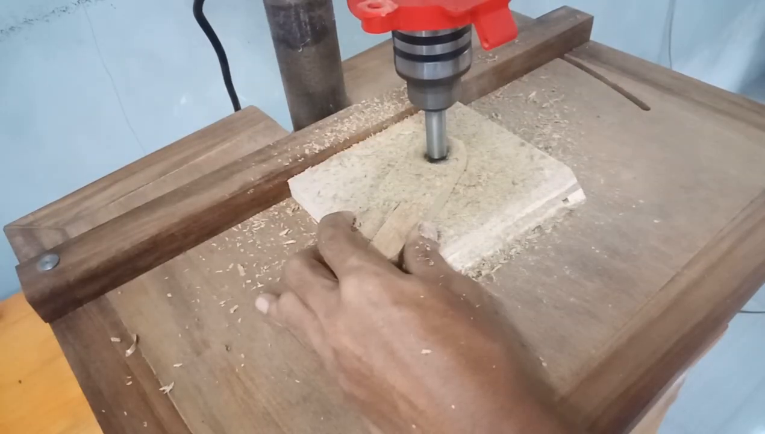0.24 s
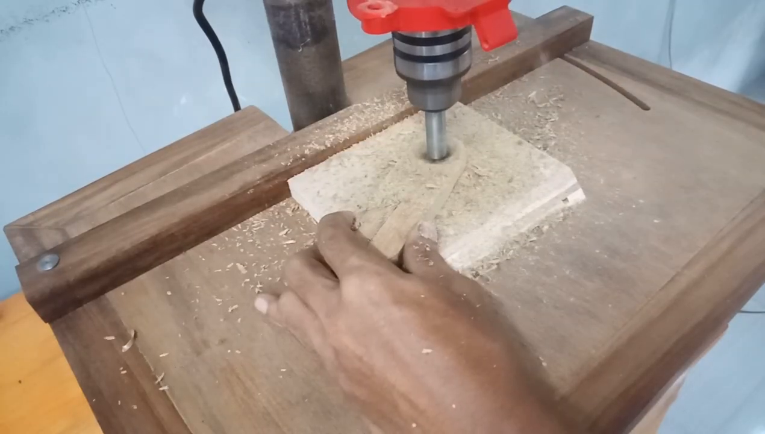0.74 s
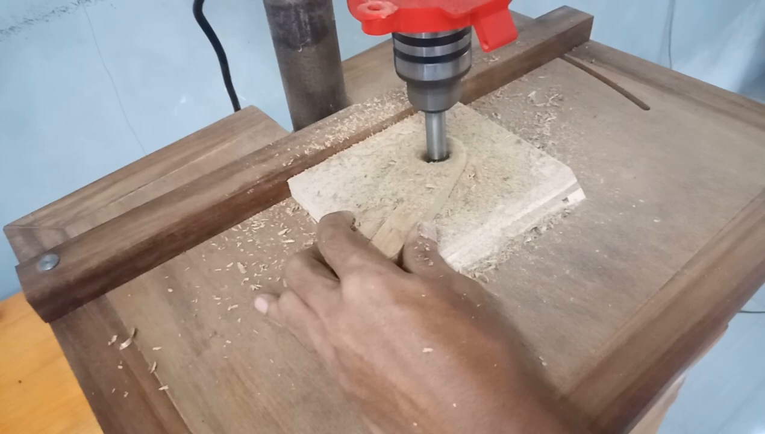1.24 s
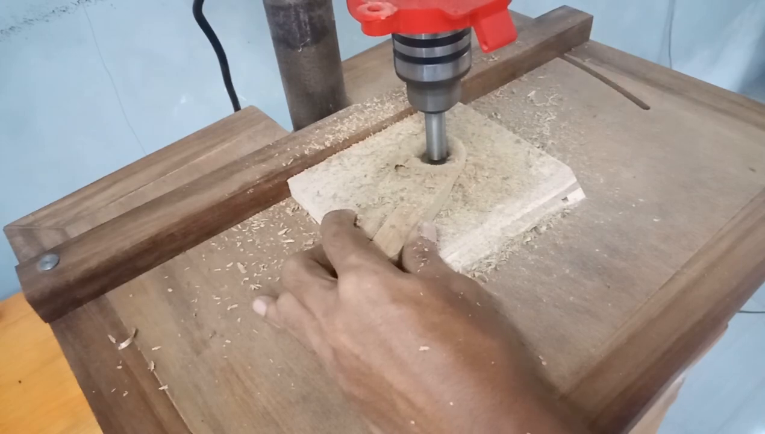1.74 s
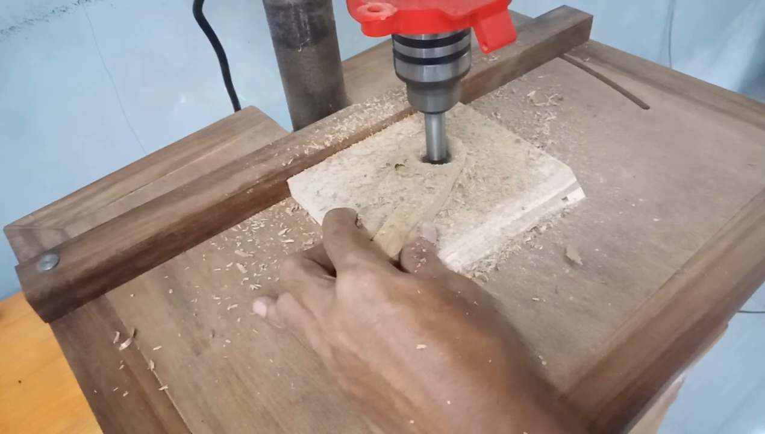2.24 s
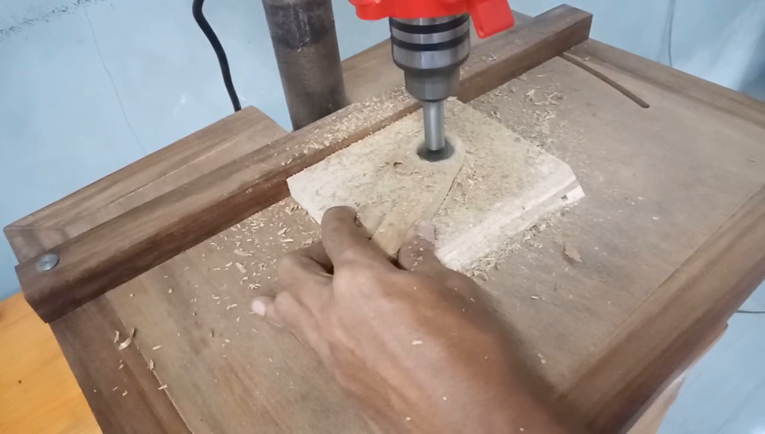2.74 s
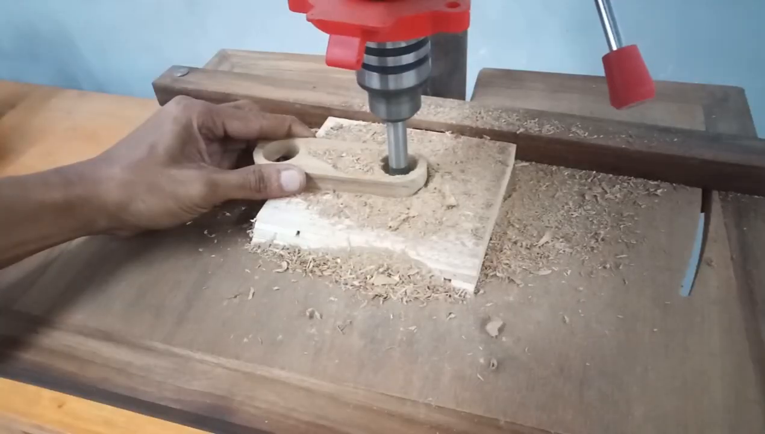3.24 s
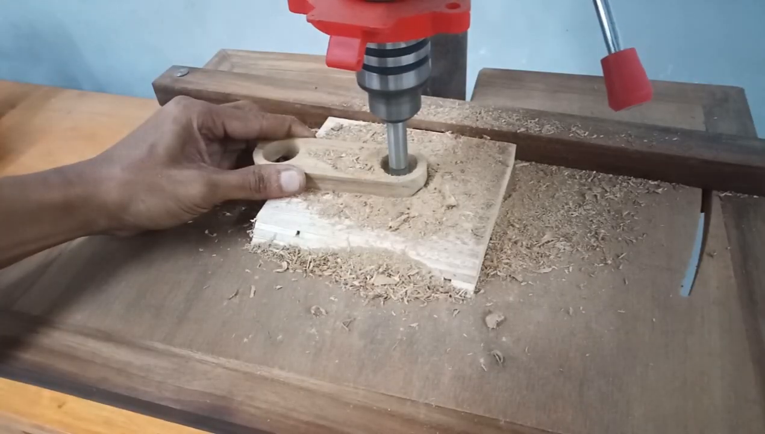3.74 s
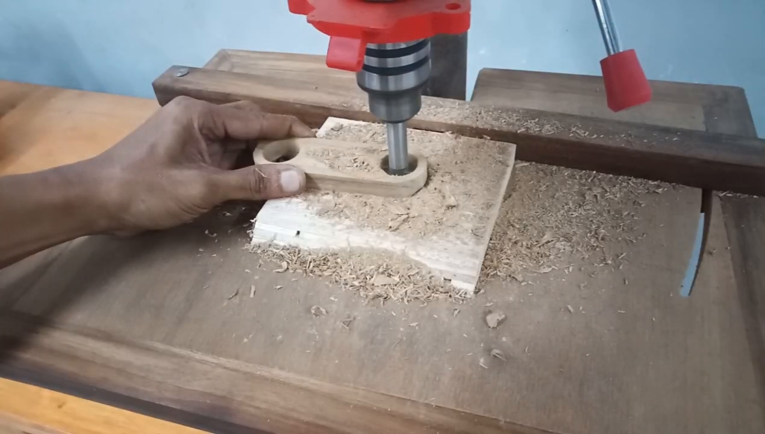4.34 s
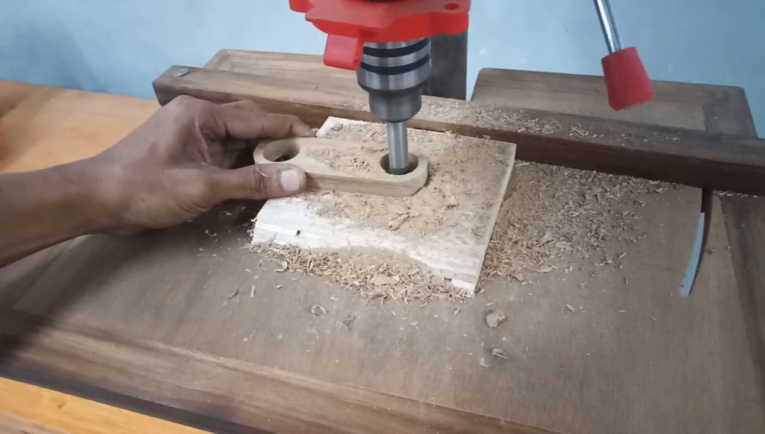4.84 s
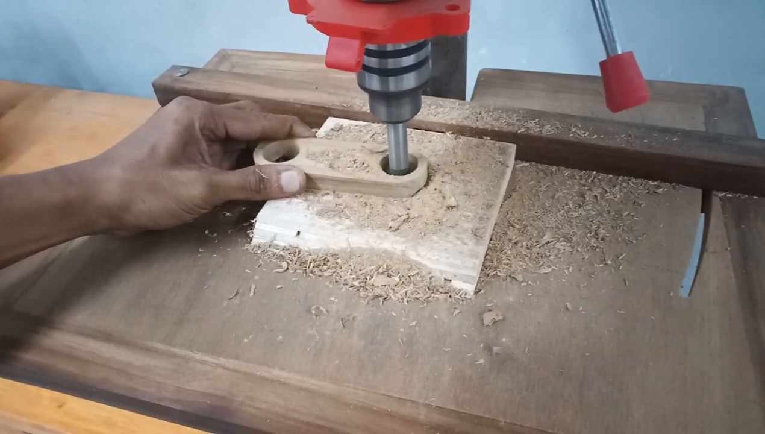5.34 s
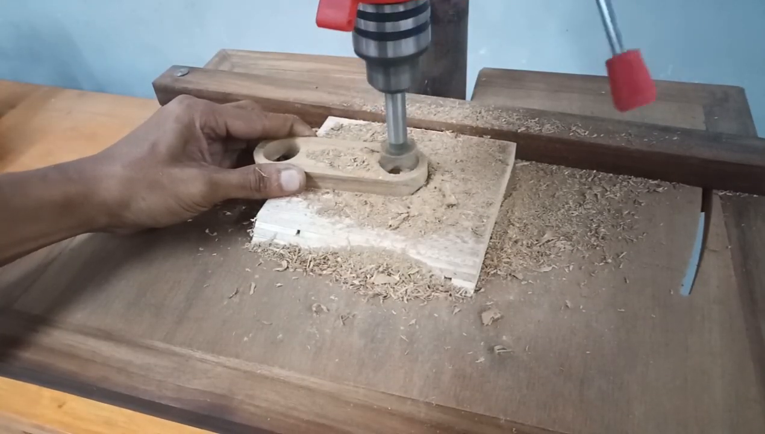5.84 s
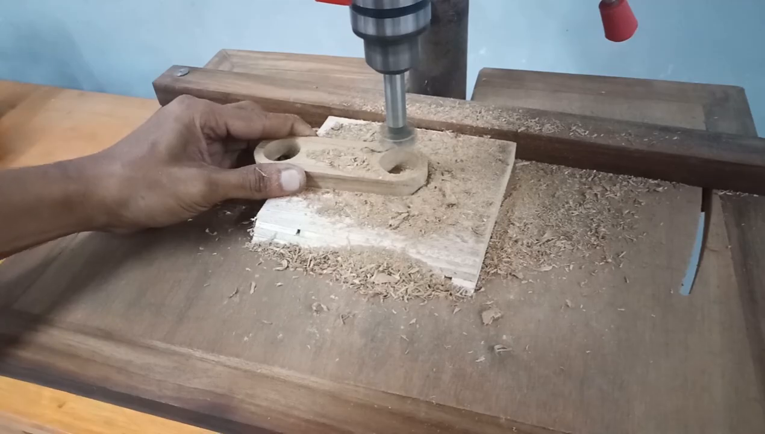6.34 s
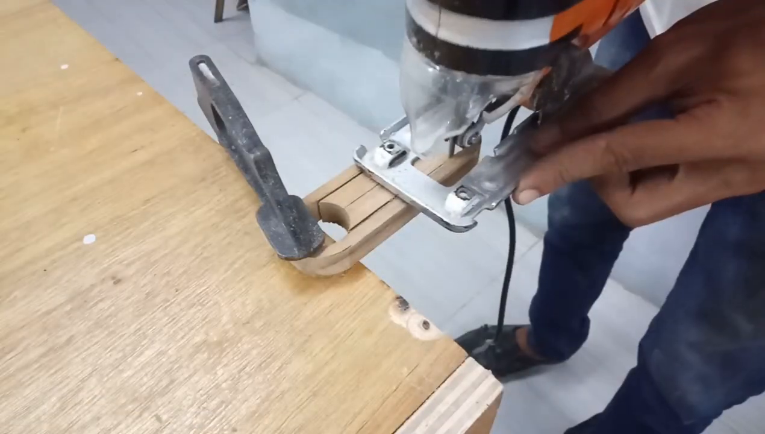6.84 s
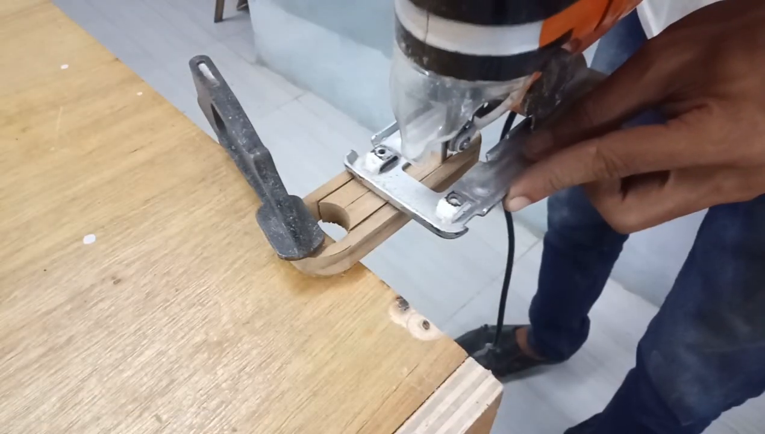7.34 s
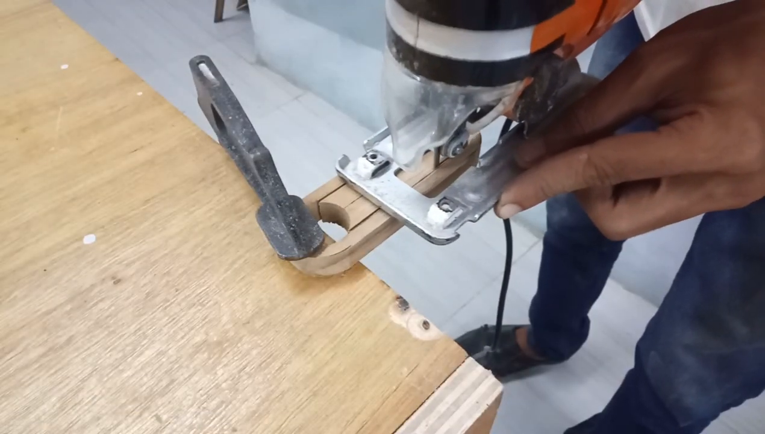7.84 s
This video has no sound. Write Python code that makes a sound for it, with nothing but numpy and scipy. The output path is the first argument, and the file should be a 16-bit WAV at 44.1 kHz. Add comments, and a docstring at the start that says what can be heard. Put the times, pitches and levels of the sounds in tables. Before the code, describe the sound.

Close in a workshop, rough rumbling drilling through wood in three plunges, a sharp knock and brief lull, then a buzzing, high-whining jigsaw cut.

```python
"""Drill press, then jigsaw

A drill press bores a small wooden board, then a wooden handle, close by in a workshop.
The bit's edges tear chips twice a turn and shake the wooden drill table; the drive belt throbs.
After a knock and a short lull, an electric jigsaw whines and chatters through a strip of wood.
Random fractures, rung through bodies of wood and steel, make the cutting; sines make hum and whine."""
import sys
import numpy as np
from scipy import signal
from scipy.fft import rfft, irfft
from scipy.io import wavfile

SR = 44100
rng = np.random.default_rng(int(sys.argv[2]) if len(sys.argv) > 2 else 0)


def master_out(mix):
    """Clip the mix to full scale and print it as 16-bit PCM to the path in sys.argv[1]."""
    frames = np.transpose(np.atleast_2d(mix))
    ceiling = np.clip(frames, -1, 1)
    pcm = np.round(ceiling * 32767).astype(np.int16)
    wavfile.write(sys.argv[1], SR, pcm)


N = 356769
TIME = np.arange(N) / SR


def gain_of(db):
    """Decibels to an amplitude factor."""
    return 10 ** (np.asarray(db) / 20)


def evened(x):
    """Scales to rms 1."""
    return x / np.sqrt(np.mean(x ** 2) + 1e-20)


def follow(rows):
    """Each column of a table as a curve in time."""
    s, *columns = np.transpose(rows)
    return [np.interp(TIME, s, column) for column in columns]


def wander(rate_hz):
    """Slow random drift of rms 1: noise that keeps only what lies below about rate_hz."""
    hz = np.fft.rfftfreq(N, 1 / SR)
    return evened(irfft(rfft(rng.standard_normal(N)) / (1 + (hz / rate_hz) ** 4), N))


def swell(start_s, rise_s, end_s=np.inf, fall_db_per_s=0):
    """A straight rise, a hold, and an even fall in dB after the end."""
    rise = np.clip((TIME - start_s) / rise_s, 0, 1)
    return rise * gain_of(-fall_db_per_s * np.maximum(TIME - end_s, 0))


def ring(x, colour, modes=(), size=8192):
    """Passes x through a causal (minimum-phase) body with a broad colour and resonances."""
    hz = np.fft.rfftfreq(size, 1 / SR)
    at_hz, level_db = np.transpose(colour)
    db = np.interp(np.log(hz + 1), np.log(at_hz), level_db)
    for centre_hz, width_hz, lift_db in modes:
        db = db + lift_db / (1 + (2 * (hz - centre_hz) / width_hz) ** 2)
    log_gain = np.log(gain_of(np.r_[db, db[-2:0:-1]]))
    response = np.fft.ifft(np.exp(np.conj(signal.hilbert(log_gain)))).real
    return signal.oaconvolve(x, response[:size // 2])[:N]


def resonate(x, hz, width_hz):
    """A steep resonance that follows the curve hz; rms 1."""
    turn = np.exp(2j * np.pi * np.cumsum(hz * np.ones(N)) / SR)
    r = np.exp(-np.pi * width_hz / SR)
    # shift the note down to zero, smooth it there, shift it back up
    smoothed = signal.lfilter([(1 - r) ** 2], [1, -2 * r, r * r], x / turn)
    return evened((turn * smoothed).real)


def fractures(per_s, spread_db):
    """Random clicks of breaking fibres, a few of them large; rms 1."""
    size = gain_of(spread_db * np.minimum(rng.exponential(1, N), 3))
    return evened(size * rng.choice([-1, 1], N) * (rng.random(N) < per_s / SR))


def surge(turns, depth_db):
    """A swell of force once a turn; rms 1."""
    return evened(gain_of(depth_db * np.cos(2 * np.pi * turns)))


def tones(turns, orders, waver_db):
    """Sines on multiples of a rotation, each wavering in level."""
    total = 0
    for multiple, level_db in orders:
        level = gain_of(level_db + waver_db * wander(23))
        total = total + level * np.sqrt(2) * np.sin(2 * np.pi * (multiple * turns + rng.random()))
    return total


def blows(rows, colour, modes=()):
    """One sharp push a row, heard through a body whose response is scaled to peak at 1."""
    pushes = np.zeros(N)
    for s, db in rows:
        pushes[round(s * SR)] = gain_of(db)
    return ring(pushes, colour, modes) / abs(ring(signal.unit_impulse(N), colour, modes)).max()


def bursts(rows, colour, modes=()):
    """Each burst is a run of fractures that starts quickly and dies away, heard through a body."""
    length_s, force = .04, 0
    for s, db in rows:
        progress = np.clip((TIME - s) / length_s, 0, 1)
        force = force + gain_of(db) * np.sin(np.pi * np.sqrt(progress))
    return force * evened(ring(fractures(5000, spread_db=1.5), colour, modes))


def room(x, wet_db, t60):
    """Adds the workshop's diffuse tail: each band's power dies away with scattered phase."""
    hop = 128
    hz, _, z = signal.stft(x, SR, nperseg=512, noverlap=512 - hop)
    keep = gain_of(-120 * hop / SR / t60)  # power kept from frame to frame
    power = signal.lfilter([0, 0, 1 - keep], [1, -keep], abs(z) ** 2)
    above_bass = hz[:, None] > 200
    scattered = above_bass * np.sqrt(power) * np.exp(2j * np.pi * rng.random(z.shape))
    tail = signal.istft(scattered, nperseg=512, noverlap=512 - hop)[1][:N]
    return x + gain_of(wet_db) * np.std(x) * evened(tail)


# colour of the workshop's low noise: pitch_hz, level_db
SHOP_COLOUR = [(25, -34), (100, -7), (170, -6), (235, 3.5), (300, -8.5), (700, -6), (1200, -17),
               (5000, -30)]


def shop_noise():
    """Steady noise coloured by the workshop."""
    return gain_of(-51.5) * evened(ring(rng.standard_normal(N), SHOP_COLOUR))


# small metal ticks as the tool is handled: start_s, level_db
TICKS = [(6.373, -29), (6.467, -38), (6.586, -36.5)]
# colour of a tick: pitch_hz, level_db
TICK_COLOUR = [(2400, -12), (3700, 0), (7000, -5)]


def ticks():
    """Single sharp pushes with a bright metal colour and a short room tail."""
    return room(blows(TICKS, TICK_COLOUR), wet_db=-5, t60=.04)


# knocks of wood and tool: start_s, level_db
KNOCKS = [(6.003, -30), (6.012, -26), (6.3667, -14.5)]
# colour of a knock: pitch_hz, level_db
KNOCK_COLOUR = [(100, -26), (600, -1.5), (2900, -4), (3500, -15), (6000, -25)]
# resonances of a knock: pitch_hz, width_hz, lift_db
KNOCK_MODES = [(942, 100, 16.5), (1780, 260, 10.5), (2750, 450, 8)]


def knocks():
    """A hard tap, then a quick clatter as the wood and the tool settle."""
    t = np.arange(SR // 8) / SR
    settling = gain_of(-60 * t / 0.115) * (t > .002)
    clatter = rng.standard_normal(len(t)) * (rng.random(len(t)) < .04) * settling
    blow = signal.unit_impulse(len(t)) + .62 * clatter / np.linalg.norm(clatter)
    return signal.oaconvolve(blows(KNOCKS, KNOCK_COLOUR, KNOCK_MODES), blow)[:N]


SAW_START_S = 6.615  # the jigsaw comes in

# the motor sags as the blade binds and races as it comes free: start_s, speed_turns_per_s
MOTOR_SPEED = [(6.63, 497), (6.73, 491), (6.85, 495.5), (7.15, 494.5), (7.29, 491.5), (7.48, 492.8),
               (7.77, 489), (7.87, 496), (8.09, 492.5)]
GEAR_RATIO = 10.24  # motor turns per blade stroke


def saw_rotation():
    """Motor speed in turns a second, turns of the motor, and strokes of the geared-down blade."""
    speed, = follow(MOTOR_SPEED)
    turns = np.cumsum(speed + 0.8 * wander(30)) / SR
    return speed, turns, turns / GEAR_RATIO


# lines of the motor's whine: multiple_of_turning, level_db (relative)
MOTOR_ORDERS = [(4, -1), (5, -17), (24, -23)]
# loudness of the whine, which swells as the saw starts and as the blade comes free: start_s, level_db
WHINE_LEVEL = [(6.62, -48), (6.7, -33), (6.73, -39), (6.82, -31), (7.15, -30.3), (7.5, -31), (7.7, -34),
               (7.97, -28.5), (8.01, -32)]
# loudness of a note that beats just below the whine when the blade runs light: start_s, level_db
LOWER_WHINE_LEVEL = [(6.7, -50), (6.83, -30.5), (7, -41), (7.85, -49), (7.93, -29.5), (8.02, -44)]
LOWER_WHINE_HZ = 1944


def saw_whine(speed, turns):
    """Two close notes that beat; the room smears part of the upper one into a narrow band of noise."""
    # the smear lies 15 Hz below the main line
    smear = resonate(rng.standard_normal(N), 4 * speed - 15, width_hz=85)
    upper = evened(tones(turns, MOTOR_ORDERS, waver_db=0.7) + .32 * smear)
    lower_turns = np.cumsum(LOWER_WHINE_HZ + 7 * wander(14)) / SR
    lower = tones(lower_turns, [(1, 0)], waver_db=1.0)
    whine = gain_of(follow(WHINE_LEVEL)[0]) * upper + gain_of(follow(LOWER_WHINE_LEVEL)[0]) * lower
    return swell(SAW_START_S, rise_s=.03) * whine


# lines of the blade's hum: multiple_of_stroke_rate, level_db (relative)
STROKE_ORDERS = [(4, -21), (5, -2.5), (10, -9.5)]
BLADE_HUM_DB, PUSH_HUM_DB = -43.5, 8  # hum unpushed, and its lift at the hardest push
PUSH_S, PUSH_WIDTH_S = 7.33, 0.44  # the saw is pushed hardest here, easing off to either side


def blade_hum(strokes):
    """The blade meets the wood and hums on multiples of its strokes, while the saw shakes on the second."""
    push = np.exp(-((TIME - PUSH_S) / PUSH_WIDTH_S) ** 2)
    unsteady_strokes = strokes + 0.0036 * wander(10)
    hum = gain_of(BLADE_HUM_DB + PUSH_HUM_DB * push) * tones(unsteady_strokes, STROKE_ORDERS, waver_db=2.1)
    shaking = gain_of(-55) * tones(strokes, [(2, 0)], waver_db=1.2)
    return swell(6.695, rise_s=.05) * (hum + shaking)


# colour of the sawing: pitch_hz, level_db
SAWING_COLOUR = [(25, -31), (95, -11.5), (200, -2), (700, 0), (1100, 3.5), (2850, 1.5), (3500, -9.5),
                 (4700, -9), (7000, -19), (13500, -11.5)]
# resonances of the saw's shoe: pitch_hz, width_hz, lift_db
SHOE_MODES = [(1466, 100, 3.5), (1964, 150, 4.5), (4400, 50, 7)]
# colour of the saw's rasp: pitch_hz, level_db
SAW_RASP_COLOUR = [(600, -20), (2800, 0), (3500, -7), (4600, -5), (7000, -18)]
# the saw's steel base plate: pitch_hz, width_hz, lift_db
PLATE_MODES = [(2307, 40, 6), (2918, 60, 5)]
# the blade snags and tears a coarse bite: start_s, level_db
BLADE_SNAGS = [(6.757, -37), (6.815, -32.5), (7.087, -34.5), (7.218, -31.5), (7.4, -35), (7.823, -35),
               (8.04, -34)]


def sawing(turns, strokes):
    """Teeth rip fibres once a stroke; the shoe, pressed on the wood, buzzes three times a motor turn."""
    uneven = gain_of(1.15 * wander(48))
    teeth = fractures(7000, spread_db=2.3) * surge(strokes, depth_db=2.0) * uneven
    fibres = fractures(5000, spread_db=2.3) * surge(strokes, depth_db=2.5) * uneven
    fibres = fibres * gain_of(1.5 * wander(19))
    body = gain_of(-30.5) * evened(ring(teeth, SAWING_COLOUR, SHOE_MODES))
    rasp = gain_of(-37) * evened(ring(fibres, SAW_RASP_COLOUR, PLATE_MODES))
    buzz = gain_of(-44.5) * tones(turns + .03 * wander(40), [(3, 0)], waver_db=2.0)
    steady = swell(SAW_START_S, rise_s=0.18) * (body + rasp + buzz)
    snags = bursts(BLADE_SNAGS, SAW_RASP_COLOUR, PLATE_MODES)
    return room(steady + snags, wet_db=-7, t60=0.055)


def jigsaw():
    """One motor drives the whine, the blade's hum and the ripping of the wood."""
    speed, turns, strokes = saw_rotation()
    return saw_whine(speed, turns) + blade_hum(strokes) + sawing(turns, strokes)


DRIVE_STOP_S, DRIVE_FALL_DB_PER_S = 6.365, 190


def drive_level(load):
    """Drive level in dB: 1.5 dB less when full load pulls the belt taut, then a quick fall at the stop."""
    return -34.5 - 1.5 * load - DRIVE_FALL_DB_PER_S * np.maximum(TIME - DRIVE_STOP_S, 0)


def motor_hum(drive_db):
    """The drill motor's mains hum, one slightly unsteady 100 Hz line 16 dB below the drive."""
    return gain_of(drive_db - 16) * tones(100 * TIME + 0.16 * wander(5.7), [(1, 0.0028)], waver_db=1.5)


# colour of the drill's frame: pitch_hz, level_db
FRAME_COLOUR = [(25, -45), (55, -22), (88, -7), (150, -16.5), (215, -9.5), (270, -13), (420, -3.5),
                (650, -8.5), (1200, -14), (3300, -25), (5000, -36), (15000, -32.5)]
# resonances of the frame: pitch_hz, width_hz, lift_db
FRAME_MODES = [(203.2, 13, 10.5), (303.6, 34, 11), (416.6, 70, 10), (687.5, 69, 16), (1000, 21, 10.5)]
# the drill's steel column and guard: pitch_hz, width_hz, lift_db
STEEL_MODES = [(1413, 64, 5), (1535, 56, 5), (1910, 64, -4.5), (2033, 47, 6.5), (2200, 93, -6.5),
               (3216, 90, 5.5), (3370, 87, -4)]
BELT_HZ, BELT_SEAM_S = 11.2, 6.297  # belt laps a second; a moment when its seam strikes the pulley
RUMBLE_HZ = 350  # below this the frame rumbles evenly; above it the rattle throbs with the belt


def drive_rattle(drive_db, turns):
    """The turning spindle rattles the frame, and the belt throbs the upper part once a lap."""
    belt = surge(BELT_HZ * (TIME - BELT_SEAM_S), depth_db=3.2)
    rattle = fractures(9000, spread_db=1.2) * surge(turns, depth_db=2.5)
    rumble = signal.sosfilt(signal.butter(1, RUMBLE_HZ, fs=SR, output="sos"), rattle)
    throbbing = rumble + belt * (rattle - rumble)
    return gain_of(drive_db) * evened(ring(throbbing, FRAME_COLOUR, FRAME_MODES + STEEL_MODES))


# the spindle chatters briefly and wood or frame groans: middle_s, half_length_s, pitch_hz, level_db
GROANS = [(1.042, .14, 310, -31), (2.08, 0.087, 490, -29.5), (2.231, .11, 243, -35.5),
          (2.471, .13, 285.5, -37), (3.323, .2, 305, -33), (3.55, .14, 415, -30), (3.551, .2, 704, -32),
          (4.15, .22, 452, -31)]


def groans():
    """Each fit of chatter swells and fades on one unsteady note."""
    unsteady, out = wander(25), np.zeros(N)
    for middle_s, half_s, hz, db in GROANS:
        near = abs(TIME - middle_s) < half_s
        turns = np.cumsum(hz * (1 + .012 * unsteady[near])) / SR + rng.random()
        fade = np.cos(np.pi / 2 * (TIME[near] - middle_s) / half_s) ** 2
        out[near] += gain_of(db) * fade * np.sqrt(2) * np.sin(2 * np.pi * turns)
    return out


# sharp bright clicks: start_s, level_db
CLICKS = [(1.0914, -16), (1.143, -18), (1.8781, -18), (1.894, -20), (3.7569, -14)]
# colour of a click: pitch_hz, level_db
CLICK_COLOUR = [(1500, -29), (4500, -9), (6500, 2.5), (8500, -14), (14000, 0)]


def clicks():
    """Each click is one sharp, bright push."""
    return blows(CLICKS, CLICK_COLOUR)


# fibres tearing loose with a dry rip: start_s, level_db
RIPS = [(.725, -28), (1.079, -23.5), (1.801, -25.5), (2.124, -23)]
# colour of the bit's rasp: pitch_hz, level_db
RASP_COLOUR = [(500, -22), (1400, -4.5), (1900, 1), (2500, 0), (3400, -5.5), (5000, -15.5), (14000, -15)]


def rips():
    """Each rip is a short run of tiny fractures."""
    t = np.arange(SR // 16) / SR
    run = rng.standard_normal(len(t)) * (rng.random(len(t)) < .06) * gain_of(-60 * t / 0.074)
    return signal.oaconvolve(blows(RIPS, RASP_COLOUR), 2 * run / np.linalg.norm(run))[:N]


# the bit's edges scuff the rim of the hole on the way out: start_s, level_db
SCUFFS = [(5.437, -41), (5.48, -41), (5.838, -48), (5.999, -48)]


def scuffs():
    """Short scrapes that ring the drill's steel."""
    return bursts(SCUFFS, RASP_COLOUR, STEEL_MODES)


# the bit's edges catch the handle and break off large chips: start_s, level_db
CATCHES = [(2.913, -14), (2.934, -16), (2.961, -17.5), (3.385, -18), (3.592, -17.5), (3.909, -16)]
# the bit snags and jolts the table: start_s, level_db
JOLTS = [(.042, -15), (.326, -19.5), (.664, -18), (.83, -19), (1.473, -17), (1.497, -16.5), (2.168, -19),
         (3.245, -18.5), (3.966, -18)]
# colour of splintering wood: pitch_hz, level_db
SPLINTER_COLOUR = [(200, -31.5), (600, -4.5), (790, 1.5), (950, -1.5), (1200, -2), (1600, -10), (2200, -28),
                   (5000, -41)]
# resonances of a chip: pitch_hz, width_hz, lift_db
CHIP_MODES = [(820, 33, 9.1), (1165, 60, 6.4), (1400, 57, 7)]
# colour of the table under the board: pitch_hz, level_db
BOARD_COLOUR = [(25, -28), (50, -12), (80, -5), (155, -1.5), (255, -5.5), (480, -2.5), (570, -7.5),
                (760, -23), (1100, -32.5), (3000, -46.5)]
# resonances with the board: pitch_hz, width_hz, lift_db
BOARD_MODES = [(312.6, 50, 11.8), (433.6, 89, 11.9), (485.5, 67, 8.2), (651, 56, 14.7)]


def catches_and_jolts():
    """Catches ring as chips do; jolts ring as the board does."""
    return blows(CATCHES, SPLINTER_COLOUR, CHIP_MODES) + blows(JOLTS, BOARD_COLOUR, BOARD_MODES)


def under_bit(on_board, on_handle):
    """Hears the piece that lies under the bit: the handle takes the board's place at 2.9 s."""
    return np.where(TIME < 2.9, evened(on_board), evened(on_handle))


# colour of the table under the handle: pitch_hz, level_db
HANDLE_COLOUR = [(25, -29), (50, -14), (80, 0), (125, -4.5), (175, -8), (230, 0), (480, 0.5), (570, -4.5),
                 (760, 0), (1100, -30), (3000, -50)]
# resonances with the handle: pitch_hz, width_hz, lift_db
HANDLE_MODES = [(227.7, 15, 8), (310, 60, 5.9), (431.3, 54, 7.8), (478.6, 50, 8.9), (692, 80, 9.5)]


def table_shaking(bite):
    """Torn chips shake the wooden table through the piece on it."""
    tearing = bite * fractures(2400, spread_db=2.0)
    on_board = ring(tearing, BOARD_COLOUR, BOARD_MODES)
    return under_bit(on_board, ring(tearing, HANDLE_COLOUR, HANDLE_MODES))


# resonances of the board being scraped: pitch_hz, width_hz, lift_db
BOARD_SCRAPE_MODES = [(1014, 59, 7.9), (1803, 200, 9), (2003, 110, 8), (2620, 300, 5), (3330, 130, 5)]
# coarse chips ring the workpiece: pitch_hz, width_hz, lift_db
COARSE_RING_MODES = [(680, 80, 11)]
# resonances of fine chips: pitch_hz, width_hz, lift_db
FINE_CHIP_MODES = [(835, 110, 5), (1210, 180, -1), (1600, 350, 8)]


def splintering(bite, grain_db):
    """Over 7 dB of grain the chips go from fine and dull to coarse and ringing."""
    cracking = bite * fractures(5500, spread_db=2.0)
    coarse = np.clip(.5 + grain_db / 7, 0, 1)
    coarse_chips = under_bit(ring(cracking, SPLINTER_COLOUR, BOARD_SCRAPE_MODES + COARSE_RING_MODES),
                             ring(cracking, SPLINTER_COLOUR, CHIP_MODES + COARSE_RING_MODES))
    fine_chips = under_bit(ring(cracking, SPLINTER_COLOUR, BOARD_SCRAPE_MODES + CHIP_MODES[1:]),
                           ring(cracking, SPLINTER_COLOUR, FINE_CHIP_MODES))
    return coarse * coarse_chips + (1 - coarse) * fine_chips


def rasping(bite):
    """The flutes scrape the hole: the board rings itself, the handle rings the drill's steel."""
    scraping = bite * fractures(4000, spread_db=2.5) * gain_of(1.0 * wander(19.0))
    on_board = ring(scraping, RASP_COLOUR, BOARD_SCRAPE_MODES)
    return under_bit(on_board, ring(scraping, RASP_COLOUR, STEEL_MODES))


# colour of the boom's thumps: pitch_hz, level_db
BOOM_COLOUR = [(30, -37), (70, -11), (130, 0.5), (270, -2.5), (450, -25.5), (1500, -60.5)]
# the note that the wood booms on, which climbs as the hole deepens: start_s, pitch_hz
BOOM_PITCH = [(0, 171.4), (1.05, 161.4), (2.05, 213.7), (2.5, 279.4), (2.9, 100.2), (3.8, 139.7), (4, 224)]
NOTE_SHARE = .55  # the note's share of the boom's power


def booming(bite):
    """Low thumps of the bite, mixed with a moving note that resonates in the wood."""
    thumps = evened(ring(bite * fractures(1200, spread_db=1.0), BOOM_COLOUR))
    note = resonate(bite * rng.standard_normal(N), follow(BOOM_PITCH)[0], width_hz=45)
    note = signal.sosfilt(signal.butter(2, 85, "highpass", fs=SR, output="sos"), note)
    return np.sqrt(1 - NOTE_SHARE) * thumps + np.sqrt(NOTE_SHARE) * note


# plunges of the bit, levels before feed and grain sway them: bite_s, ease_s, dying_db_per_s,
# clear_s (stops rubbing the hole), shake_db, splinter_db, rasp_db, boom_db,
# boom_drift_db_per_s (with depth)
PLUNGES = [(-.02, 2.42, 27, 2.47, -29, -36.5, -45, -37.6, -1.6),
           (2.9, 4.42, 80, 4.65, -29, -33, -43.5, -39.5, -7.5),
           (4.81, 5.5, 80, 5.65, -28.5, -33.5, -44.5, -47, 0)]
# the hand's pressure on the feed lever, about the usual: start_s, level_db
FEED = [(.05, 2), (.25, -4.5), (.55, 2.5), (1.1, 1), (1.35, -.5), (3.05, 0), (3.2, -1), (3.33, 2.5),
        (3.7, -0.5), (4.87, 0), (5.1, -2), (5.3, 1), (5.5, -.5)]
BITE_S, RASP_RISE_S = .06, 0.1  # the cut starts quickly; the rasp builds as the flutes enter
CLEAR_DB_PER_S = 36  # the rasp dies as the bit comes clear
RUB_DB = -13.5  # an unfed bit still shakes the table this much, relative to cutting
SPLINTER_DYING = 2  # splintering dies this many times faster than the shaking
# dB that each layer moves for a dB of pressure
FEED_SPLINTER, FEED_BOOM, FEED_RASP = .4, 0.78, 0.19
# dB that each layer moves for a dB of coarser grain
COARSE_SHAKE, COARSE_BOOM, COARSE_RASP = -.55, 0.45, 0.43


def plunges(grain_db):
    """Strength of each cutting layer: a plunge bites, holds and eases, swayed by the hand and the grain."""
    feed_db, = follow(FEED)
    shake = splinter = rasp = boom = 0
    for start, end, dying, clear, shake_db, splinter_db, rasp_db, boom_db, drift in PLUNGES:
        cutting = swell(start, BITE_S, end, dying)
        rubbing = swell(start, RASP_RISE_S, clear, CLEAR_DB_PER_S)
        splitting = swell(start, BITE_S, end, SPLINTER_DYING * dying)
        depth_s = np.clip(TIME, start, end) - (start + end) / 2  # feeding time about mid-plunge
        shake = shake + np.maximum(cutting, gain_of(RUB_DB) * rubbing) * gain_of(shake_db)
        splinter = splinter + splitting * gain_of(splinter_db)
        rasp = rasp + rubbing * gain_of(rasp_db)
        boom = boom + cutting ** 2 * gain_of(boom_db + drift * depth_s)
    shake = shake * gain_of(feed_db + COARSE_SHAKE * grain_db)
    splinter = splinter * gain_of(FEED_SPLINTER * feed_db + grain_db)
    rasp = rasp * gain_of(FEED_RASP * feed_db + COARSE_RASP * np.maximum(grain_db, 0))
    boom = boom * gain_of(FEED_BOOM * feed_db + COARSE_BOOM * grain_db)
    return shake, splinter, rasp, boom


# how coarsely the wood under the bit splinters, about the usual: start_s, level_db
GRAIN = [(1.35, -1.2), (1.6, 2), (2.3, 3), (2.95, .5), (3.25, 1.5), (3.4, 4), (3.6, 2.5), (3.92, 3),
         (4.03, -6.5), (4.4, -1.5), (4.87, -3), (5.25, 1), (5.5, 0)]
IDLE_HZ, SAG_HZ = 47.7, 4.3  # spindle turns a second, and their drop under full load


def drill_press():
    """The drive rattles the frame; the bit tears chips that shake the table and slow the spindle."""
    grain_db, = follow(GRAIN)
    shake, splinter, rasp, boom = plunges(grain_db)
    load = np.clip(shake / gain_of(-27.5), 0, 1)
    turns = np.cumsum(IDLE_HZ - SAG_HZ * load + 1.27 * wander(6)) / SR
    drive_db = drive_level(load)
    # two cutting edges, one biting deeper, meet uneven grain
    bite = surge(turns, depth_db=1.5) * surge(2 * turns, depth_db=1.0) * gain_of(1.5 * wander(41))
    cutting = shake * table_shaking(bite) + splinter * splintering(bite, grain_db) + rasp * rasping(bite)
    accidents = catches_and_jolts() + scuffs() + rips()
    in_room = room(drive_rattle(drive_db, turns) + cutting + accidents, wet_db=-13.5, t60=.1)
    return motor_hum(drive_db) + boom * booming(bite) + groans() + in_room


def scene():
    """Both machines, clicks, knocks and ticks over the workshop's low noise."""
    return (shop_noise() + ticks() + knocks() + jigsaw() + clicks() + drill_press())[None]


# the microphone's response: pitch_hz, level_db
MICROPHONE = [(20, 1.5), (3700, -2), (4400, -11.5), (4950, -18.5), (5350, -26.5), (6500, -26.5),
              (16000, -31)]
EDGE_HZ = 15600  # top of the band


def record(dry):
    """A microphone with dull treble, then the band limit."""
    dull = ring(dry[0], MICROPHONE)
    band_limit = signal.firwin(511, EDGE_HZ, window=("kaiser", 9), fs=SR)
    return signal.oaconvolve(dull, band_limit, "same")[None]


dry = scene()
out = record(dry)
master_out(out)
```